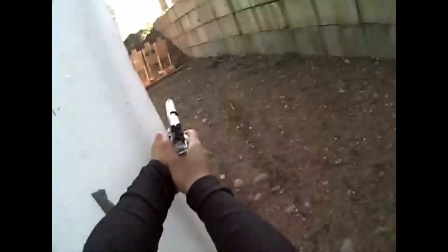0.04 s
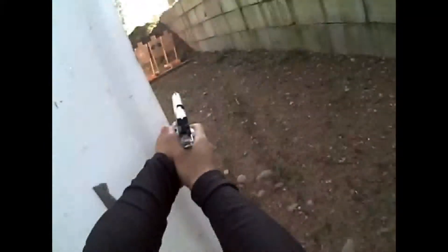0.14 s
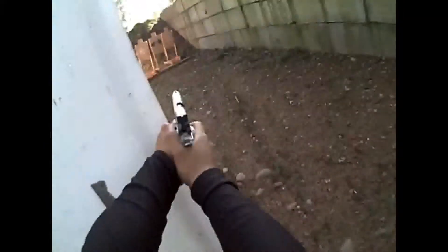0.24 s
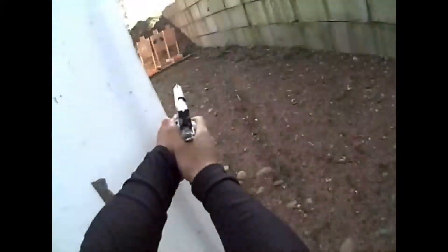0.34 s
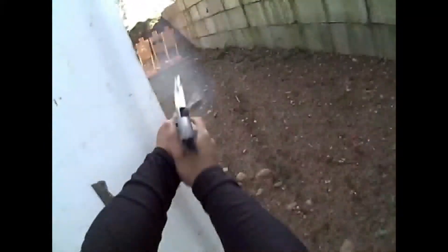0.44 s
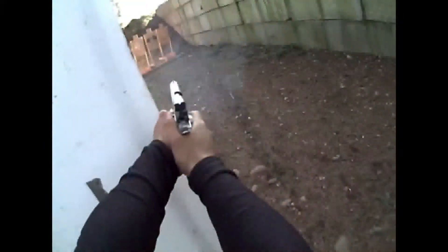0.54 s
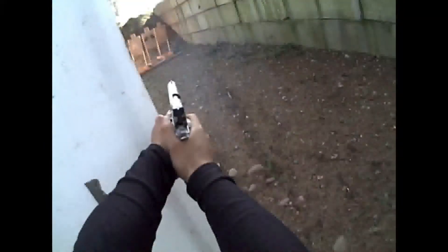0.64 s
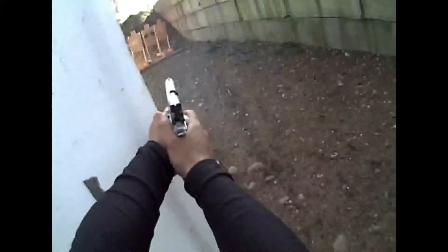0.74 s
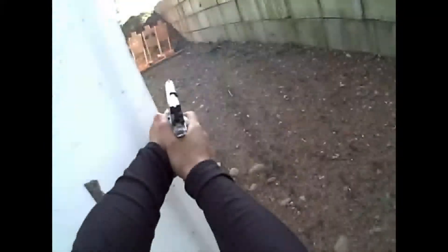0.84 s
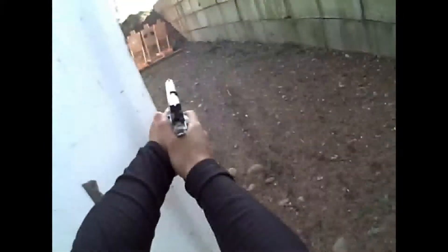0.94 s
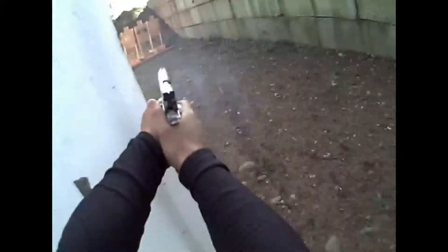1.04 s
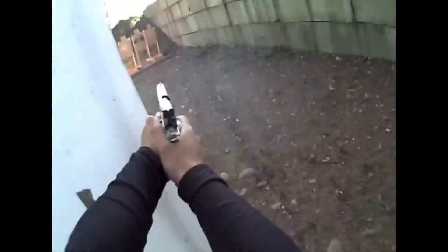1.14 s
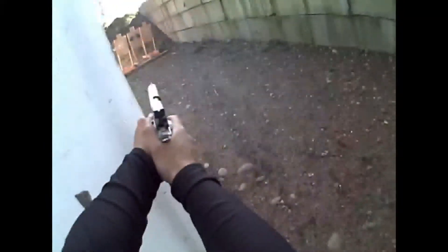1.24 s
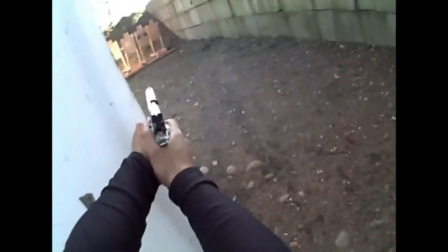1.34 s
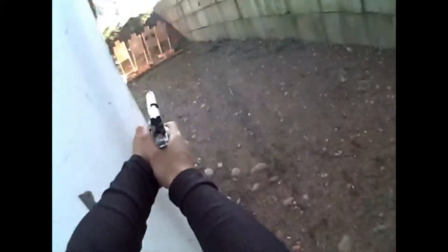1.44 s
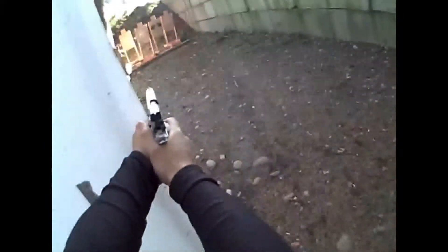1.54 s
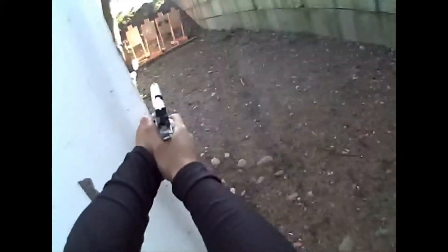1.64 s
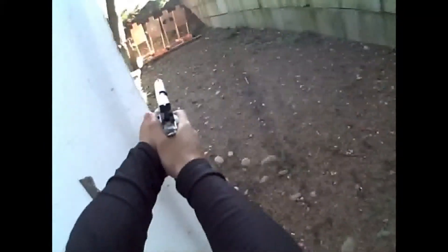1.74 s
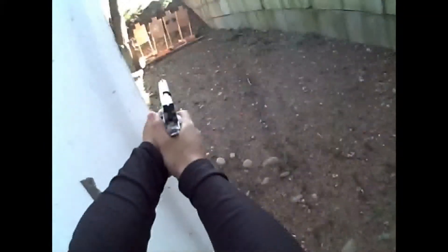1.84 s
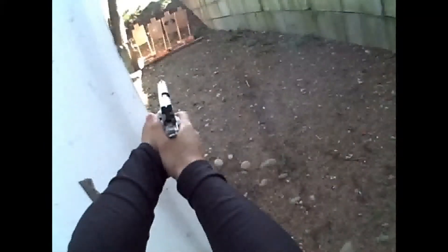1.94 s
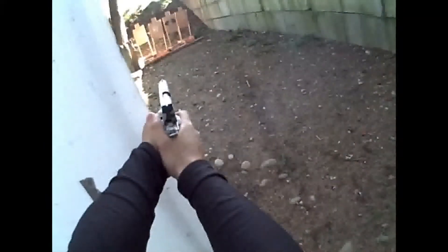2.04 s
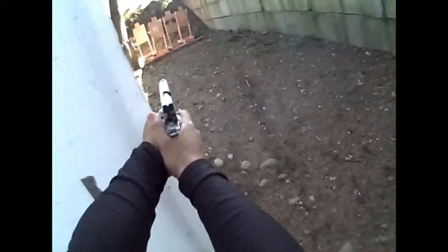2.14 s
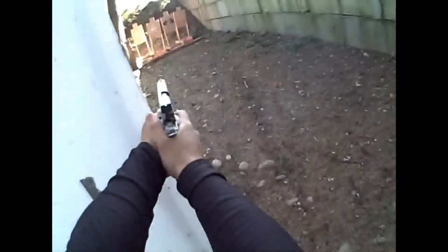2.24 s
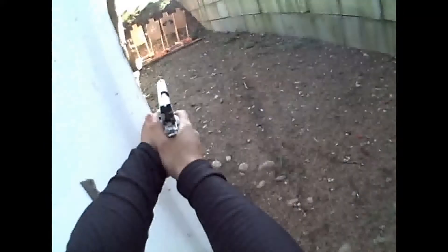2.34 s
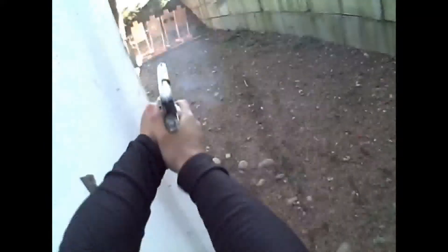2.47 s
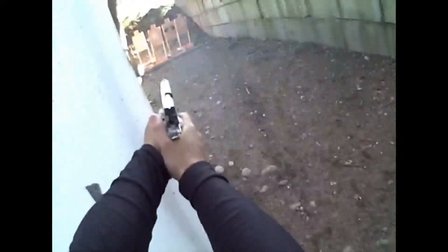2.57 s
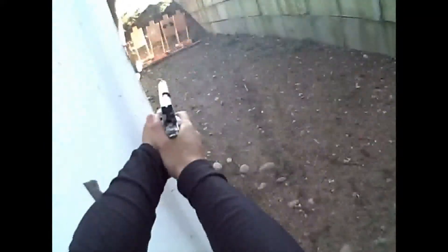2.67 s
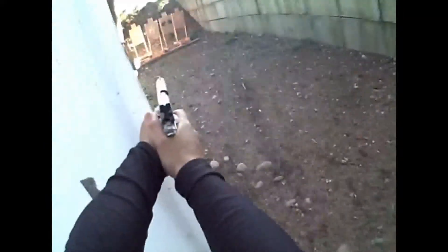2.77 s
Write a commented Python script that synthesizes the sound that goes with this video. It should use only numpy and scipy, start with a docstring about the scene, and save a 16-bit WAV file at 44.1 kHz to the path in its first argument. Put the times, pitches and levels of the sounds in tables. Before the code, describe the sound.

Three loud close handgun shots distort a small microphone, after a softer shot, with echoing tails

```python
"""A yard between block walls: three close pistol shots overload a small head-worn microphone.
Each blast is coloured noise slapping between the walls, over a fluttering bay echo and a long yard echo,
plus a slow pulse that shoves the diaphragm down and swings it back. A farther shot comes just before
them: two pops, a dull boom and a roll of noise. Low wind, soft bumps, an older echo dying away,
faint floor noise and hiss, metal ticks and a thin chirp lie underneath."""
import sys
import numpy as np
from scipy import signal
from scipy.io import wavfile
from scipy.ndimage import uniform_filter1d

SR = 44100
rng = np.random.default_rng(int(sys.argv[2]) if len(sys.argv) > 2 else 0)


def materialize(psi):
    """Save the field psi as 16-bit PCM at rate SR to the path in sys.argv[1].

    A 1-D psi becomes a single channel; in a 2-D psi each row is a channel.
    """
    bounded = np.clip(np.atleast_2d(psi).T, -1, 1)
    quanta = np.round(bounded * 32767).astype(np.int16)
    wavfile.write(sys.argv[1], SR, quanta)


N = 125685  # length in samples

# Colour tables: pitch_hz, level_db (relative density per Hz; noise() evens out the overall level)
# Decay tables: pitch_hz, t60_s (time to fall 60 dB)

# Close shots: start_s, blast_db, yard_echo_db
CLOSE_SHOTS = [(0.5121, 2, -35.5), (1.052, -4.5, -38), (2.4720, -8, -43.5)]
# Slaps between the walls: delay_s, level_db (before scatter), dull_share (0-1)
WALL_SLAPS = [(0, 6, 0), (.0046, 10, 0), (.0088, 2.5, 0.49), (0.019, 7.5, 0.26), (0.0229, 1, 0),
              (0.0378, -1, .4), (0.057, -8, .8), (.0795, -9.5, .5), (0.101, -15.5, .3)]
# Diaphragm travel per close shot: first_shove (full scale), first_decay_s, second_shove (full scale),
# second_decay_s, swing_back (full scale), swing_decay_s
DIAPHRAGM_SHOVES = [(2.1, 0.016, 0.77, 0.047, 0.99, .035), (1.53, 0.014, 0.92, 0.0078, 0.047, .11),
                    (0.73, 0.0095, 0.51, 0.025, 0.11, 0.2)]
# Colour of the bright slaps: pitch_hz, level_db
CRACK_COLOUR = [(180, -33), (300, 8.5), (1120, -13.5), (1860, -7.5), (2720, 4.5), (4570, -1.5), (7070, 4),
                (8600, -10), (11200, -48.5), (18900, -120)]
# Colour of the bay echo: pitch_hz, level_db
BAY_COLOUR = [(24, -32.5), (40, 1), (70, -20), (158, -10.5), (679, -11.5), (1420, -18), (1630, -20),
              (2230, -18.5), (5360, -22), (8600, -30), (11200, -49.5), (18900, -120)]
# Decay of the bay echo: pitch_hz, t60_s
BAY_T60 = [(60, 0.23), (300, .33), (1000, 0.42), (3000, 0.38), (8000, .36)]
# Colour of the yard echo: pitch_hz, level_db
YARD_COLOUR = [(40, -15), (120, -5.5), (300, -7), (800, -2), (1500, -5), (3000, -3.5), (5500, -10),
               (8600, -24)]
# Decay of the yard echo: pitch_hz, t60_s
YARD_T60 = [(100, 4.0), (700, 2.3), (2000, 1.555), (4500, 1.1), (8000, 1.6)]
# Colour of the dull slaps and of the farther boom: pitch_hz, level_db
DULL_COLOUR = [(60, -2), (300, -2.5), (600, 0), (1100, -2), (1600, -25.5), (8000, -62.5)]
# Colour of the farther shot's roll: pitch_hz, level_db
ROLL_COLOUR = [(24, -47), (40, -5.5), (92, 1), (276, -19.5), (485, -2), (930, -5), (1520, -8.5),
               (2280, -9.5), (6000, -11), (8600, -20.5), (11200, -62.5), (18900, -120)]
# Swell of the farther shot's roll, before its grain: time_s (in the scene), level_db
ROLL_LEVEL = [(0.203, -23), (0.315, -16.5), (0.499, -31), (0.505, -26)]
# Low wind, before its gusts: time_s, level_db
WIND_LEVEL = [(0, -26.5), (.19, -38.5), (.21, -23), (.3, -46), (.5, -37.5), (.9, -53.5), (1.45, -50.5),
              (1.6, -59), (2.05, -64), (2.2, -62), (2.32, -55), (2.45, -58), (2.85, -54)]
# Soft bumps: centre_s, level_db, half_width_s
SOFT_BUMPS = [(.0525, -13, .0035), (.0955, -22, .004), (.126, -27, .008), (.285, -19, .003),
              (2.05, -52, .005), (2.134, -46, .005), (2.1955, -40, .004), (2.24, -47, .007),
              (2.33, -48, .006)]
# Colour of the older echo: pitch_hz, level_db
OLD_ECHO_COLOUR = [(88, -38.5), (150, 6), (271, -9), (508, -2), (1290, -8.5), (1500, -13.5), (5540, -21.5),
                   (8600, -28), (11200, -42.5), (18900, -120)]
# Small metal ticks: start_s, level_db
METAL_TICKS = [(.0421, -31), (.0781, -43)]
# Partials of one metal tick: pitch_hz, level_db, t60_s
TICK_PARTIALS = [(2277, 7.5, 0.01), (3800, -17, 0.02), (5560, -6.5, 0.012)]
# Colour of the late hiss: pitch_hz, level_db
HISS_COLOUR = [(180, -48), (300, -20.5), (1020, 2), (1450, -7), (6050, -10), (8600, -24), (11200, -56),
               (18900, -120)]
# Colour of the steady floor noise: pitch_hz, level_db
FLOOR_COLOUR = [(59, -22.5), (100, -19.5), (300, -9.5), (376, -3), (444, -17), (516, -6), (6500, -40),
                (7830, -30.5), (8600, -51.5), (11200, -78.5), (18900, -120)]

# Wall slaps: each holds its level, then drops to a decaying body
SLAP_HOLD_S, SLAP_T60_S, SLAP_BODY_DB, SLAP_SCATTER_DB = .0017, .03, -9, 1.5
# Bay echo
BAY_DB, FLUTTER_HZ, FLUTTER_DB, BAY_GRAIN_DB = -3.5, 50, 2.5, -.5
# Diaphragm timing after the start of each close shot
SHOVE_LAG_S, SECOND_SHOVE_S, SWING_S, SWING_RISE_S = .0014, .0214, .0377, .0009
# Farther shot
FAR_START_S, POP_DB, POP_PEAK_S = .2015, -8, .0004
BOOM_DB, BOOM_DB_PER_S, BOOM_LUMP_DB = -21.5, -56, 1
ROLL_GRAIN_DB, ROLL_END_DB_PER_S = .7, -100
TAIL_START_S, TAIL_DB, TAIL_DB_PER_S = .3, -40.5, -37.5  # start counts from the farther shot
# Background
WIND_LOW_HZ, WIND_HIGH_HZ, GUST_DB = 9, 42.3, 2
OLD_ECHO_DB, OLD_ECHO_DB_PER_S = -43.5, -7
CHIRP_START_S, CHIRP_LENGTH_S, CHIRP_HZ, CHIRP_DB = 2.215, .09, 7700, -78
HISS_START_S, HISS_FADE_S, HISS_DB, HISS_DB_PER_S = 2.362, .011, -63.5, 69
FLOOR_DB = -67.5
# Microphone: rails in full scale, the knee is an exponent
INPUT_RAIL, RAIL_LEAK, OUTPUT_RAIL, OUTPUT_KNEE = .63, .05, .8, 6.4
MIC_HZ, COUPLING_HZ, EDGE_HZ = 8600, .8, 16200


def amp(db):
    """Turn decibels into a linear gain."""
    return 10 ** (np.asarray(db) / 20)


def read(points, hz):
    """Read a pitch table between its points on a log pitch scale."""
    pitch, value = np.transpose(points)
    return np.interp(np.log(hz + 1), np.log(pitch + 1), value)


def add(mix, s, sound):
    """Lay a sound into the mix from s seconds, cut at the end of the mix."""
    part = mix[round(s * SR):][:len(sound)]
    part += sound[:len(part)]


def wander(size, width):
    """Random curve of about unit spread: white noise averaged over width samples."""
    return uniform_filter1d(rng.standard_normal(size), size=width) * np.sqrt(width)


def noise(colour, size, t60=None):
    """Coloured noise of about rms 1 at its start; with t60, each band dies at its own speed."""
    hz, t, bands = signal.stft(rng.standard_normal(size + 512), SR, nperseg=512, noverlap=384)
    gain = amp(read(colour, hz))[:, None]
    gain = gain / np.sqrt(np.mean(gain ** 2))
    if t60:
        gain = gain * amp(-60 * t / read(t60, hz)[:, None])
    return signal.istft(bands * gain, SR, nperseg=512, noverlap=384)[1][:size]


def wall_slaps():
    """The blast bouncing between the walls: short bursts shared between bright crack and dull noise."""
    bright, dull = np.zeros(N), np.zeros(N)
    t = np.arange(2000) / SR
    body = amp(SLAP_BODY_DB - 60 * t / SLAP_T60_S)
    shape = np.where(t < SLAP_HOLD_S, 1, body)
    for delay, level_db, dull_share in WALL_SLAPS:
        burst = amp(level_db + SLAP_SCATTER_DB * rng.standard_normal()) * shape
        add(bright, delay, burst * (1 - dull_share))
        add(dull, delay, burst * dull_share)
    return bright * noise(CRACK_COLOUR, N) + dull * noise(DULL_COLOUR, N)


def bay_echo():
    """Nearby echo whose level flutters regularly, roughened by random grain."""
    t = np.arange(N) / SR
    flutter_db = FLUTTER_DB * np.cos(2 * np.pi * FLUTTER_HZ * t)
    level = amp(BAY_DB + flutter_db + BAY_GRAIN_DB * wander(N, 100))
    return level * noise(BAY_COLOUR, N, BAY_T60)


def blast(blast_db, yard_db):
    """One close shot in air: wall slaps and bay echo together, then the long yard echo."""
    close = wall_slaps() + bay_echo()
    yard = noise(YARD_COLOUR, N, YARD_T60)
    return amp(blast_db) * close + amp(yard_db) * yard


def shove(first, first_s, second, second_s, swing, swing_s):
    """Diaphragm pushed down twice with exponential recovery, then crossfading to a dying upward swing."""
    t = np.arange(N) / SR
    down = first * np.exp(-(t - SHOVE_LAG_S) / first_s) * (t > SHOVE_LAG_S)
    down += second * np.exp(-(t - SECOND_SHOVE_S) / second_s) * (t > SECOND_SHOVE_S)
    up = swing * np.exp(-(t - SWING_S) / swing_s)
    crossfade = 1 / (1 + np.exp(-np.minimum((t - SWING_S) / SWING_RISE_S, 50)))
    return up * crossfade - down * (1 - crossfade)


def far_shot():
    """A double downward pop, a dull lumpy boom, a swelling roll of echoes and its long tail."""
    t = np.arange(SR) / SR
    pops = np.zeros(len(t))
    for delay in (.001, .003):
        u = np.maximum(t - delay, 0) / POP_PEAK_S
        pops -= u * np.exp(1 - u)
    boom_db = BOOM_DB + BOOM_DB_PER_S * t + BOOM_LUMP_DB * wander(len(t), 400)
    boom = amp(boom_db) * noise(DULL_COLOUR, len(t))
    time_s, level_db = np.transpose(ROLL_LEVEL)
    scene_t = t + FAR_START_S
    roll_db = np.interp(scene_t, time_s, level_db) + ROLL_GRAIN_DB * wander(len(t), 100)
    roll_db += ROLL_END_DB_PER_S * np.maximum(scene_t - time_s[-1], 0)
    tail = amp(TAIL_DB + TAIL_DB_PER_S * (t - TAIL_START_S)) * (t > TAIL_START_S)
    roll = (amp(roll_db) + tail) * noise(ROLL_COLOUR, len(t))
    return amp(POP_DB) * pops + boom + roll


def low_wind():
    """Wind rumble: a low band of noise following a level curve with random gusts."""
    band = signal.butter(2, [WIND_LOW_HZ, WIND_HIGH_HZ], "band", fs=SR, output="sos")
    rumble = signal.sosfilt(band, rng.standard_normal(N))
    level_db = np.interp(np.arange(N) / SR, *np.transpose(WIND_LEVEL))
    return rumble / rumble.std() * amp(level_db + GUST_DB * wander(N, 1600))


def soft_bumps():
    """Soft thuds: rounded downward pulses with small upward flanks."""
    t = np.arange(N) / SR
    out = np.zeros(N)
    for centre, level_db, half_width in SOFT_BUMPS:
        u = (t - centre) / half_width
        out += amp(level_db) * (u ** 2 * .25 - 1) * np.exp(-np.sqrt(u ** 2 + .1))
    return out


def old_echo():
    """An older echo: coloured noise sinking steadily until the first close shot."""
    t = np.arange(N) / SR
    level = amp(OLD_ECHO_DB + OLD_ECHO_DB_PER_S * t)
    return level * noise(OLD_ECHO_COLOUR, N) * (t < CLOSE_SHOTS[0][0])


def metal_ticks():
    """Small metal ticks: a few sine partials ringing down at their own speeds."""
    t = np.arange(3000) / SR
    ring = sum(amp(db - 60 * t / t60) * np.sin(2 * np.pi * hz * t) for hz, db, t60 in TICK_PARTIALS)
    out = np.zeros(N)
    for start, level_db in METAL_TICKS:
        add(out, start, amp(level_db) * ring)
    return out


def thin_chirp():
    """A thin chirp: one steady high sine swelling and fading over half a sine arch."""
    t = np.arange(0, CHIRP_LENGTH_S, 1 / SR)
    arch = np.sin(np.pi * t / CHIRP_LENGTH_S)
    out = np.zeros(N)
    add(out, CHIRP_START_S, amp(CHIRP_DB) * arch * np.sin(2 * np.pi * CHIRP_HZ * t))
    return out


def late_hiss():
    """Faint hiss: coloured noise rising fast until the third close shot cuts it off."""
    t = np.arange(N) / SR
    level = amp(HISS_DB + HISS_DB_PER_S * (t - HISS_START_S))
    gate = np.clip((t - HISS_START_S) / HISS_FADE_S, 0, 1) * (t < CLOSE_SHOTS[2][0])
    return level * gate * noise(HISS_COLOUR, N)


def floor_noise():
    """Steady coloured noise at the bottom of the mix."""
    return amp(FLOOR_DB) * noise(FLOOR_COLOUR, N)


def scene():
    """All sources summed at the diaphragm."""
    mix = np.zeros(N)
    for (start, blast_db, yard_db), travel in zip(CLOSE_SHOTS, DIAPHRAGM_SHOVES):
        add(mix, start, blast(blast_db, yard_db))
        add(mix, start, shove(*travel))
    add(mix, FAR_START_S, far_shot())
    mix += low_wind() + soft_bumps() + old_echo()
    mix += metal_ticks() + thin_chirp() + late_hiss() + floor_noise()
    return mix[None]


def low_pass(x, taps, cutoff_hz):
    """Steep band limit without delay."""
    return signal.oaconvolve(x, signal.firwin(taps, cutoff_hz, window=("kaiser", 9), fs=SR)[None], "same")


def record(dry):
    """Hard overload with a little leak, narrow band, coupling capacitor, soft overload, band limit."""
    x = np.clip(dry, -INPUT_RAIL, INPUT_RAIL) + RAIL_LEAK * dry
    x = low_pass(x, 301, MIC_HZ)
    # The coupling capacitor lets held offsets sag back toward zero
    x = signal.lfilter(*signal.butter(1, COUPLING_HZ, "high", fs=SR), x)
    x = x / (1 + abs(x / OUTPUT_RAIL) ** OUTPUT_KNEE) ** (1 / OUTPUT_KNEE)
    return low_pass(x, 511, EDGE_HZ)


dry = scene()
out = record(dry)
materialize(out)
```